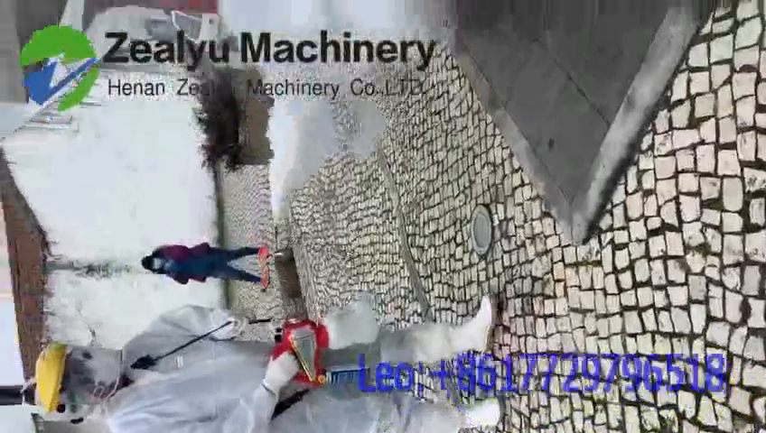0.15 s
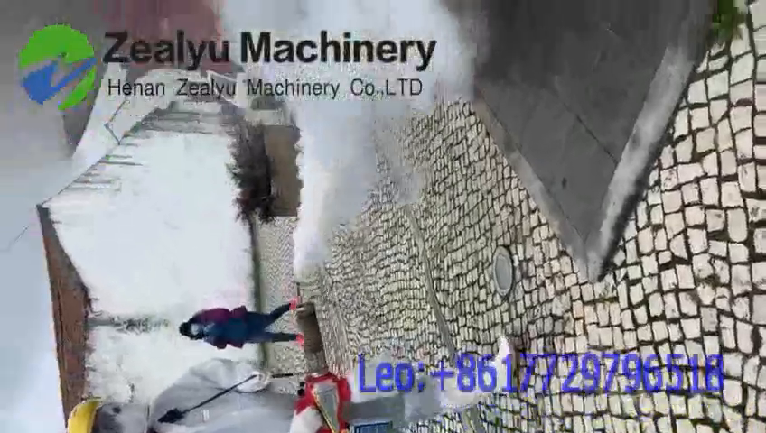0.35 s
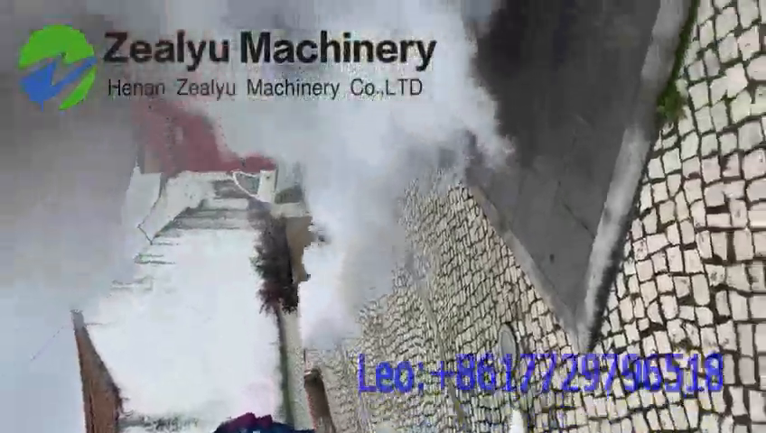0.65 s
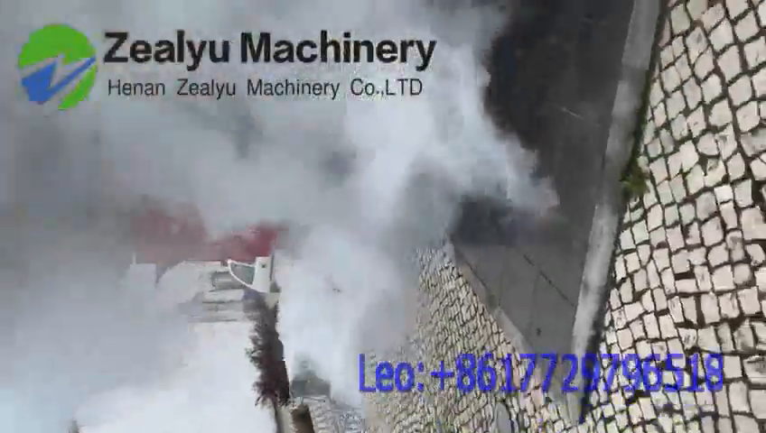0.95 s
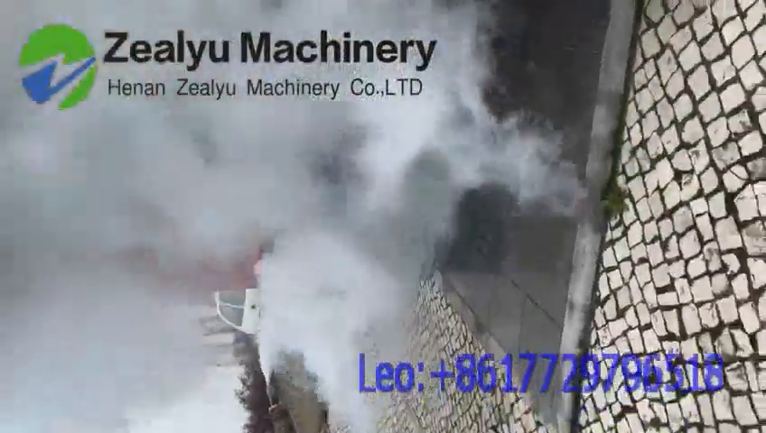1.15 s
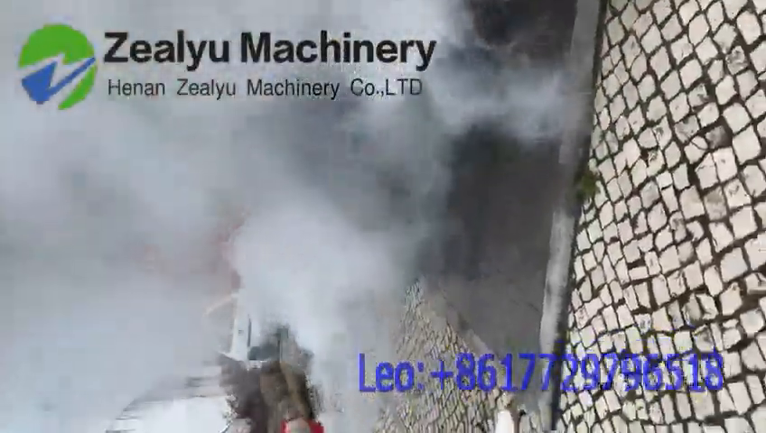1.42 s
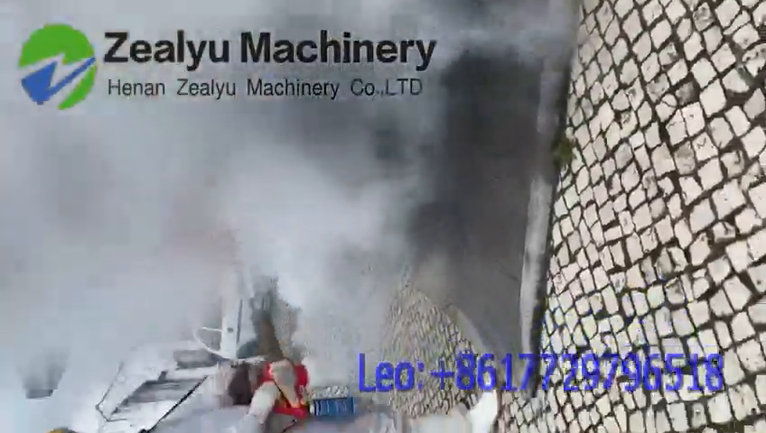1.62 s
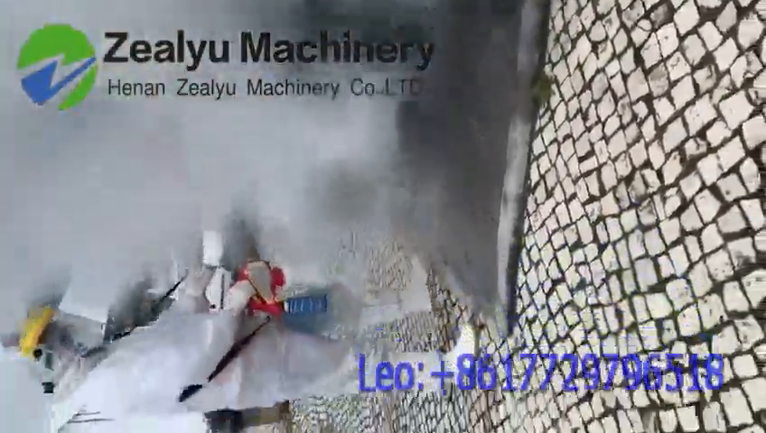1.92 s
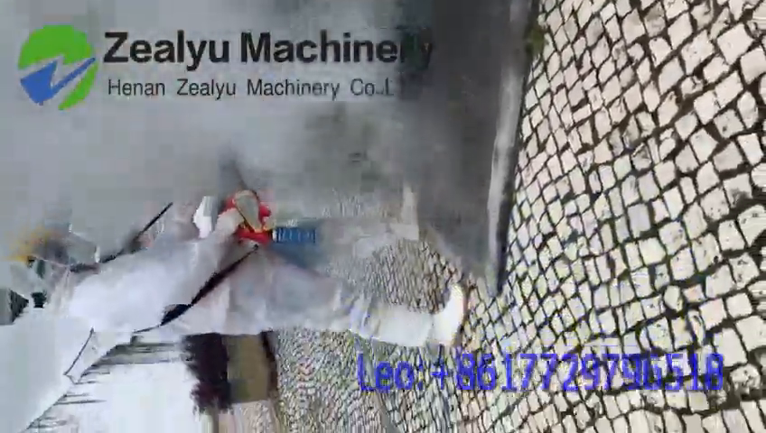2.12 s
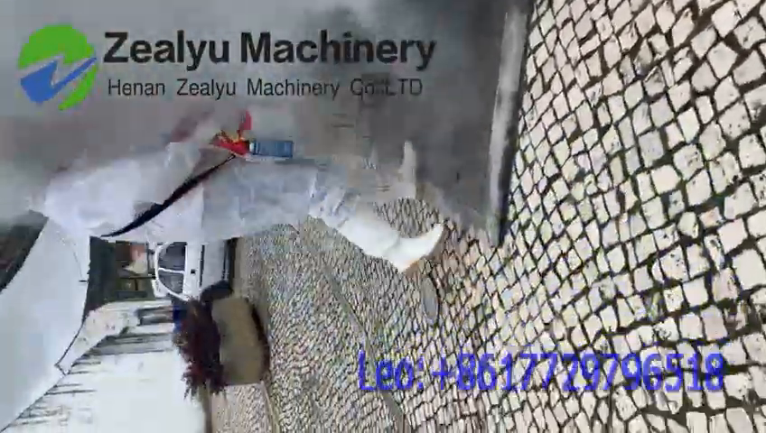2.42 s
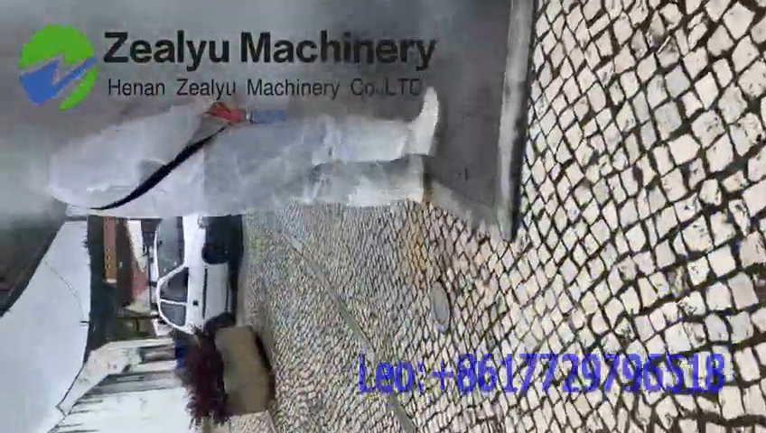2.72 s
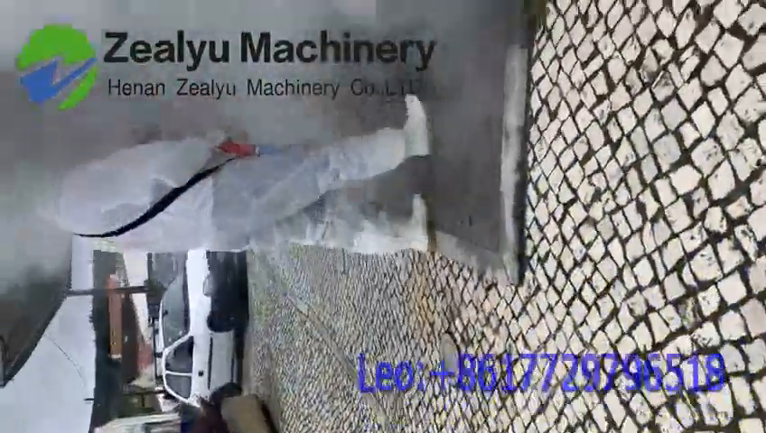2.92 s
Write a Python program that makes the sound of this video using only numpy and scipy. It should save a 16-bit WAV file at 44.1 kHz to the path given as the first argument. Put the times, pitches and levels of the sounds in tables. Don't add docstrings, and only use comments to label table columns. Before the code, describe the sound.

A carried thermal fogger gives a continuous rough roar over a low, fast throbbing hum in a walled street. Its bright hiss and fuzzy whistle start strong, fade by 0.5 seconds, then the hiss jumps back near 0.8; whistling peaks around 1.3 and fades by 1.6. From 2 to 2.5 seconds, low gusts thump the phone's stereo microphones; rumble and hiss surge again near 2.85. The sound is grainy and compressed.

```python
import sys
import numpy as np
from scipy import signal
from scipy.io import wavfile
from scipy.ndimage import uniform_filter1d

SR = 44100
rng = np.random.default_rng(int(sys.argv[2]) if len(sys.argv) > 2 else 0)


def voltage_ratio(level):
    return 10 ** (np.asarray(level, float) / 20)


def dump_mix(stems):
    frames = np.atleast_2d(stems).T
    limited = np.clip(frames, -1, 1)
    pcm = np.round(limited * 32767).astype(np.int16)
    wavfile.write(sys.argv[1], SR, pcm)


N = 134946


def evened(x):
    return x / np.sqrt(np.mean(x ** 2) + 1e-20)


def read(points, hz):
    f, value = np.transpose(points)
    return np.interp(np.log(hz + 1), np.log(f + 1), value)


def curve(table, t):
    rows = np.transpose(table)
    return [np.interp(t, rows[0], column) for column in rows[1:]]


def drift(t, lo_hz, hi_hz):
    rates_hz = np.geomspace(lo_hz, hi_hz, num=24)
    return evened(sum(np.sin(2 * np.pi * (f * t + rng.random())) / np.sqrt(f) for f in rates_hz))


def slow_drift(t, lo_hz, hi_hz):
    return drift(t[::64], lo_hz, hi_hz).repeat(64)[:N]


def grid():
    return np.fft.rfftfreq(512, 1 / SR)[:, None], np.arange(N // 128 + 5) * 128 / SR


# [pitch_hz, level_db]
SIDES = [(40, 9.5), (130, 1), (330, -10), (700, -1), (1300, -0.5), (12000, -0.5)]


def noise(gain, same, turn, patchy_db, flicker_db):
    hz, t = grid()
    a, b, c, d, patches = rng.standard_normal((len(t), 257, 5)).T
    patches = uniform_filter1d(patches, size=5, axis=0)
    patches = evened(uniform_filter1d(patches, size=20, axis=1))
    same = np.clip(same, 0, 1)
    left = a + 1j * b
    right = np.exp(1j * turn) * (same * left + np.sqrt(1 - same ** 2) * (c + 1j * d))
    lean_db = read(SIDES, hz) / 2
    z = np.array([left, right]) * voltage_ratio(np.array([lean_db, -lean_db]))
    z *= gain * voltage_ratio(patchy_db * patches + flicker_db * drift(t, 3.8, 40))
    return signal.istft(z, nperseg=512, noverlap=384)[1][:, :N] / np.sqrt(1536)


# [start_s, level_db]
RUMBLE = [(0, -48), (.9, -48.5), (1.1, -47.5), (1.9, -45.5), (2.0, -48), (2.2, -35), (2.5, -41),
          (2.62, -49), (2.72, -42.5), (2.83, -32.5), (2.92, -47), (3.06, -32)]


def rumble():
    center_hz, width_hz, apart = 67, 52, .24
    t = np.arange(N) / SR
    r = np.exp(-np.pi * width_hz / SR)
    a = rng.standard_normal((3, N))
    carrier = np.exp(2j * np.pi * center_hz * t)
    low = signal.lfilter([1], np.convolve([1, -r], [1, -r]), (a[0] + apart * a[1:]) / carrier)
    return evened((low * carrier).real) * voltage_ratio(curve(RUMBLE, t)[0]) * voltage_ratio([[-.5], [.5]])


# [start_s, peak_db, pitch_hz, half_length_s]; start is the middle of the gust
GUSTS = [(1.976, -23, 270, 0.0032), (1.976, -35.5, 567, 0.012), (1.984, -26, 72.6, 0.017),
         (2.013, -23.5, 95, 0.01), (2.095, -23.5, 81, 0.01), (2.108, -28, 82, 0.0078),
         (2.281, -16.5, 72, 0.019), (2.315, -23.5, 304, 0.0043), (2.18, -29.5, 326, 0.005),
         (2.25, -26, 109, 0.01), (2.344, -28, 65.4, .012), (2.378, -23, 90, 0.014),
         (2.391, -24, 85, 0.0052), (2.455, -24, 79, 0.023), (2.411, -31, 69, 0.015),
         (2.597, -34, 70, 0.015), (2.656, -32, 60, 0.018)]


def gusts():
    t, out = np.arange(N) / SR, np.zeros((2, N))
    for middle_s, peak_db, hz, half_s in GUSTS:
        u = (t - middle_s) / half_s
        level_db = peak_db + read(SIDES, max(hz, 170)) * np.array([[.5], [-.5]])
        turns = hz * (t - middle_s) * (1 - 0.049 * np.clip(u, -3, 3))
        out += voltage_ratio(level_db) * np.exp(-u ** 2) * np.cos(2 * np.pi * turns)
    return out


def firing():
    firing_hz, wander = 96.5, .015
    t = np.arange(N) / SR
    return np.cumsum(firing_hz * (1 + wander * slow_drift(t, 0.49, 10.0))) / SR


# [start_s, roar_level_db, bass_tilt_db, firing_tone_db]
NEAR = [(0, -34, -4, -42), (.3, -33.5, -7, -45.5), (.6, -33.5, -7.5, -47.5), (.9, -33.5, -4, -48),
        (1.1, -32, -4.5, -56), (1.3, -30.5, -9, -56), (1.6, -33, -1.5, -56), (1.8, -32, -4.5, -61),
        (1.9, -30.5, -5, -61), (2.0, -31, 1, -73), (2.28, -29, -1.5, -50), (2.44, -29.5, 0, -57.5),
        (2.6, -30.5, -1, -50), (2.8, -30, -7, -45), (3.06, -33.5, 4.5, -56)]
# [multiple_of_firing, level_db]
ORDERS = [
    (1, 0),
    (2, -14),
    (3, -18),
    (4, -16),
]


def hum(turns):
    t = np.arange(N) / SR
    tone = sum(voltage_ratio(db) * np.cos(2 * np.pi * (k * turns + rng.random())) for k, db in ORDERS)
    waver_db = 2.5 * slow_drift(t, 2.63, 9)
    return np.sqrt(2) * tone * voltage_ratio(curve(NEAR, t)[2] + waver_db) * voltage_ratio([[-1.2], [1.2]])


# [pitch_hz, density_db]
ROAR = [(40, -3), (120, -5), (180, 5.5), (330, 2), (700, -0.5), (1330, 1.5), (2200, -5), (3300, -12)]
# [pitch_hz, phase_rad]
ROAR_TURN = [(150, -0.03), (350, -0.55), (650, -1.55), (1000, -1.7), (1500, -1.15), (2050, -1.6),
             (2500, -2.5), (3300, -1.9)]
# [pitch_hz, likeness_0_to_1]
ROAR_SAME = [(60, .95), (250, .92), (500, .66), (800, .8), (1400, .76), (2000, .62), (2600, .75),
             (3500, .5)]


def roar(turns):
    top_hz, gate = 3600, .07
    pipe_hz, pipe_width_hz, pipe_db, pipe_wander, pipe_fade_db_per_s = 1330, 140, -2, .04, 2.5
    hz, t = grid()
    level_db, tilt_db, _ = curve(NEAR, t)
    wide = voltage_ratio(read(ROAR, hz)) / (1 + (hz / top_hz) ** 6)
    gain = wide / np.sqrt(np.mean(wide ** 2)) * voltage_ratio(level_db + 9.5 + tilt_db / (1 + (hz / 450) ** 2))
    center_hz = pipe_hz * (1 + pipe_wander * drift(t, 0.64, 4.9))
    ring = 1 / (1 + (2 * (hz - center_hz) / pipe_width_hz) ** 2)
    gain = gain * (1 + voltage_ratio(pipe_db - pipe_fade_db_per_s * t) * ring)
    throb = 1 + gate * np.cos(2 * np.pi * turns)
    return throb * noise(gain, read(ROAR_SAME, hz), read(ROAR_TURN, hz), 0.92, 0.8)


# [start_s, jet_level_db]
AIM = [(0, -38.5), (.12, -41), (.2, -43.5), (.5, -49.5), (.74, -51), (.82, -39.5), (.88, -41), (1.1, -39.5),
       (1.25, -40), (1.3, -38.5), (1.42, -39), (1.6, -42), (1.92, -48.5), (2.45, -48), (2.67, -44.5),
       (2.82, -48.5), (2.86, -38.5), (3.06, -43)]
# [pitch_hz, density_db]
JET = [(500, -11), (2000, -6), (3200, -2.5), (4500, 3), (5400, -2), (7700, -4.5), (11650, -6),
       (12050, -21.5)]
# [pitch_hz, width_hz, level_db]
WHISTLES = [
    (3600, 80, -7),
    (4040, 90, -5),
    (4600, 240, -6),
    (4920, 110, -10),
]
# [start_s, level_over_jet_db]
SING = [
    (0, 0),
    (.12, -3),
    (.2, -12),
    (.85, -10),
    (1.08, -3),
    (1.22, -8),
    (1.3, 2),
    (1.4, -1),
    (1.55, -12),
    (3.06, -12),
]


def jet():
    lag_s, zero_hz, same, whistle_share = .000238, 2600, .975, 2.6
    hz, t = grid()
    level_db, whistle_db = curve(AIM, t)[0], curve(SING, t)[0]
    wide = voltage_ratio(read(JET, hz))
    lines = sum(voltage_ratio(db + 2 * drift(t, 0.93, 54)) / (1 + (2 * (hz - f) / w) ** 2) for f, w, db in WHISTLES)
    whistling = 1 + whistle_share * voltage_ratio(whistle_db) * lines
    gain = wide / np.sqrt(np.mean(wide ** 2)) * whistling * voltage_ratio(level_db + 12)
    return noise(gain, same, -2 * np.pi * lag_s * (hz - zero_hz), 1.8, 0.47)


def scene():
    turns = firing()
    return rumble() + gusts() + hum(turns) + roar(turns) + jet()


# [pitch_hz, level_db]
DROP_SUM = [(1500, -30), (2200, -11), (3300, -9), (4300, -5.5), (5400, -5), (7000, -8), (8200, -4.5),
            (11500, -9)]
# [pitch_hz, level_db]
DROP_DIFF = [(1200, -30), (2200, -14), (4700, -11), (6200, -3.5), (7300, -4), (9000, -8), (10600, -3),
             (11800, 0)]
# [from_hz, to_hz]
EMPTY = [
    [(4420, 5120), (8420, 9550)],
    [(6130, 7450), (10380, 12000)],
]
# [pitch_hz, spread_db]
STREAKS = [(600, .5), (1300, 2.2), (2300, 3.6), (4000, 4.2), (7500, 4), (11000, 2.5)]
# [pitch_hz, level_db]
FINENESS = [(200, 22), (1500, 15), (2000, 7), (4000, 4.5), (6500, 4), (9000, 4.5), (11500, 1.5)]


def starve(x):
    mood_spread_db, mask_db, rich_s = 1.7, -34, 1.745
    rise = np.cumsum(np.kaiser(1025, 4 * np.pi))
    rise = np.sqrt(rise[:-1] / rise[-1])
    window = np.r_[rise, rise[::-1]]
    k, n = np.arange(1024) + .5, np.arange(2048) + 512.5
    basis = np.cos(np.pi / 1024 * np.outer(n, k)) * window[:, None] / np.sqrt(512)
    pair = np.pad([x[0] + x[1], x[0] - x[1]], ((0, 0), (1088, 3072 - (N + 64) % 1024)))
    pair = pair.reshape(2, -1, 1024) / 2
    z = np.concatenate([pair[:, :-1], pair[:, 1:]], axis=2) @ basis
    hz, t = k * SR / 2048, (np.arange(z.shape[1]) * 1024 - 64) / SR

    ridges = uniform_filter1d(rng.standard_normal(z.shape), size=3, axis=1)
    ridges = evened(uniform_filter1d(ridges, size=4, axis=2))
    spread_db = read(STREAKS, hz)
    z = z * voltage_ratio(spread_db * ridges - np.log(10) / 20 * spread_db ** 2)

    power = z ** 2
    near = uniform_filter1d(power, size=7, axis=2)
    total = power.sum(0)
    both = uniform_filter1d(total, size=41, axis=1) + voltage_ratio(2 * mask_db) * total.mean(1)[:, None]
    mood_db = mood_spread_db * evened(uniform_filter1d(rng.standard_normal(power.shape), size=30, axis=2))
    drop_db = np.array([read(DROP_SUM, hz), read(DROP_DIFF, hz)])[:, None]
    limit = voltage_ratio(2 * (drop_db + mood_db))
    limit *= 1 + 30 * np.array([[sum((hz > a) & (hz < b) for a, b in spans)] for spans in EMPTY])

    rich = (abs(t[:, None] - rich_s) < .013) & (hz < 5400)
    step = np.sqrt(abs(both) + 1e-20) * voltage_ratio(mood_db - read(FINENESS, hz) - 12 * rich)
    kept = (near > limit * both) | rich
    coarse = np.sign(z) * np.floor(abs(z) / step + .4) * step * kept
    coarse[0] *= voltage_ratio(11 * (rich & (hz > 4300)))
    back = coarse @ basis.T
    s, d = (back[:, 1:, :1024] + back[:, :-1, 1024:]).reshape(2, -1)[:, 64:N + 64]
    return np.array([s + d, s - d])


def band_limit(x):
    return signal.sosfilt(signal.butter(12, 12920, fs=SR, output="sos"), x)


def record(dry):
    edge = signal.firwin(511, 12060, window=("kaiser", 9), fs=SR)
    cut = signal.oaconvolve(dry, edge[None], "same")
    return band_limit(starve(cut))


dry = scene()
out = record(dry)
dump_mix(out)
```